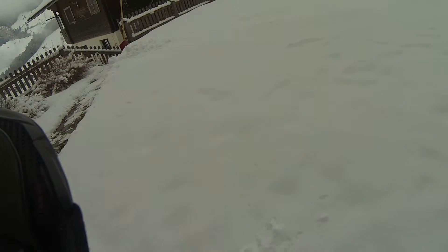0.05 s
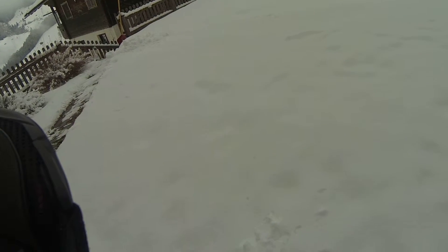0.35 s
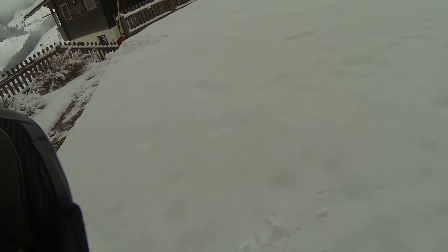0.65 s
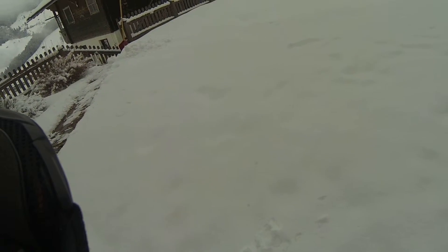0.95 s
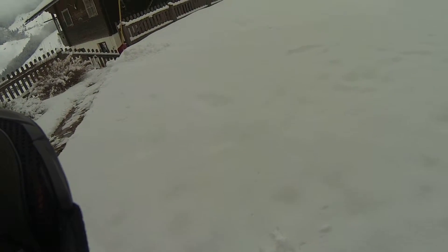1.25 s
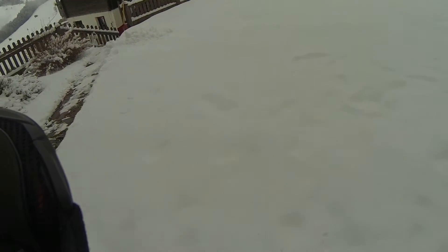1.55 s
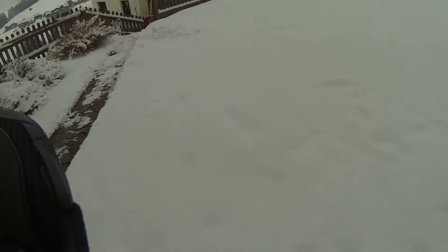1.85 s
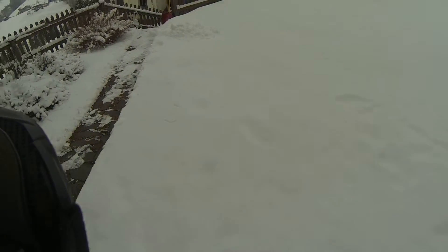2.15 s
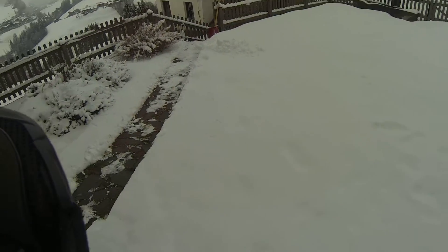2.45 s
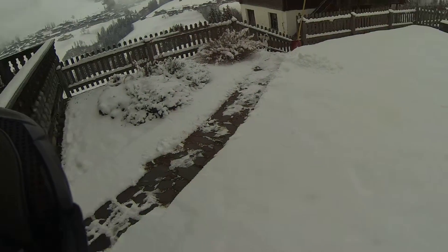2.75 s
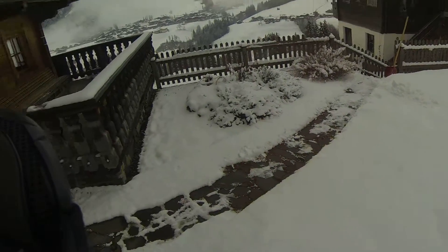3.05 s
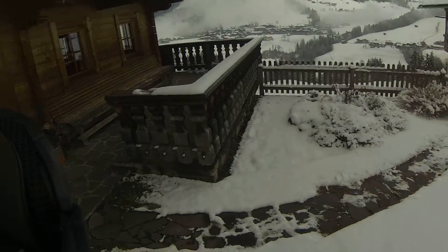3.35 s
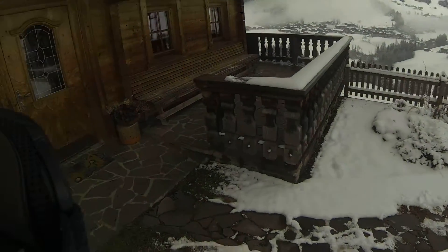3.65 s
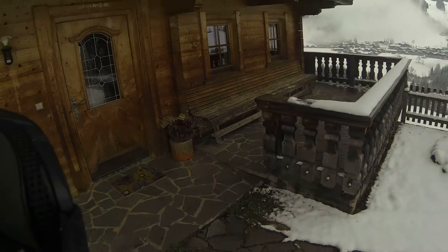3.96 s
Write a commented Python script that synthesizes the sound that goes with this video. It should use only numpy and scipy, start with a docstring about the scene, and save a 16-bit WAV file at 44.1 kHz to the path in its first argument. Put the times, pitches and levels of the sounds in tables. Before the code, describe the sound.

Gear clicks twice against a body-worn camera outdoors, with a low rumble underneath.

```python
"""Two sharp plastic clicks over a low rumble: gear knocks on the housing of a body-worn camera, right
at its one microphone, and nearby walls scatter each click back. Outdoors in the snow, the wearer
stands, then turns round; the rumble is the mount swaying with the body. Clothing brushes faintly
past the housing, and under it all lie quiet air, microphone hiss and two thin electronic whines."""
import sys
import numpy as np
from scipy import signal
from scipy.fft import rfft, irfft
from scipy.io import wavfile
from scipy.ndimage import uniform_filter1d

SR = 44100
rng = np.random.default_rng(int(sys.argv[2]) if len(sys.argv) > 2 else 0)


def store_wav(level_fs):
    """Save 16-bit WAV to argv[1]."""
    pcm = np.round(np.clip(np.atleast_2d(level_fs), -1, 1) * 32767)
    wavfile.write(sys.argv[1], SR, pcm.T.astype(np.int16))


N = 176400
TIME = np.arange(N) / SR
GRIT_LOW_HZ, CLOTH_TREBLE_HZ = 3300, 7070   # lower edge of grit and snags; where cloth's treble begins


def gear_contacts():
    """Gear taps and grates on plastic at the microphone; returns the whole force and the grit alone."""
    # Each click is light touches, a main hit and a rebound.
    # Each row: start in seconds, level in dB, treble cutoff in Hz, grit in dB relative to the tap.
    contacts = [(1.6694, -39.5, 9100, -13), (1.6710, -31, 9900, -14), (1.67282, -13.5, 11600, -33),
                (1.6736, -23, 7300, -27), (1.68, -35.5, 4000, -16), (1.8825, -49, 11000, -12),
                (1.8847, -34.5, 9000, -18.5), (1.88675, -28.5, 10000, -19), (1.8874, -26.5, 7000, -20.5),
                (1.88922, -31.6, 1880, -23), (1.8916, -38.5, 8000, -12)]
    grit_decay_s = 0.0022
    taps, grits = np.zeros((2, N))
    age = TIME[:SR // 50]
    for s, db, bright_hz, grit_db in contacts:
        start = int(s * SR)
        tap = np.maximum(1 - np.abs(age + start / SR - s) * SR, 0)   # an impulse shared by two samples
        grit = from_db(grit_db) * rng.standard_normal(len(age)) * np.exp(-age / grit_decay_s)
        taps[start:start + len(age)] += from_db(db) * lowpass(tap, bright_hz)
        grits[start:start + len(age)] += from_db(db) * lowpass(grit, bright_hz, order=1)
    grits = highpass(grits, GRIT_LOW_HZ)
    return taps + grits, grits


def housing_clicks(force):
    """The housing rings, each struck spot in its own balance of modes; a soft push adds a dull thud."""
    # The housing's modes. Each row: pitch in Hz, gain in dB at the first spot, gain in dB at the
    # second, seconds to die away by 60 dB.
    modes = [(243, -17, -21, 0.0257), (456, -17, -12, 0.023), (1076, -2, 0, .0055), (1430, -3.5, -2, .0131),
             (1582, 1.5, 5, 0.02), (2250, -5.5, -9.5, .0095), (3000, -1, -2.5, 0.01),
             (3634, -4.5, -15, 0.011), (3790, -8, -11, 0.0071), (4729, -8.5, -15.5, 0.009),
             (5290, -10.5, -16.5, 0.0066), (6540, -16, -13.5, 0.0049), (8120, -22, -18.5, 0.0055),
             (11249, -15.5, -19.5, 0.0041), (12982, -16, -20, .004)]
    # The gear's push behind each click. Each row: peak time in seconds, level in dB.
    thuds = [(1.6718, -40.5), (1.886, -30.5)]
    push_s, second_spot_from_s = 0.00054, 1.8
    push = sum(from_db(db) * np.exp(-np.minimum(((TIME - s) / push_s) ** 2, 20)) for s, db in thuds)
    out = signal.oaconvolve(push / (push_s * SR), ring(hz=276, t60=0.022))
    for k, (hz, first_db, second_db, t60) in enumerate(modes):
        strength = np.where(TIME < second_spot_from_s, from_db(first_db), from_db(second_db))
        out += (-1) ** k * signal.oaconvolve(strength * force, ring(hz, t60))
    return highpass(out[:N], hz=140)   # so small a shell radiates little bass


def wall_echoes(force):
    """Walls and a fence a few metres off scatter back a short tail that fades in and dies away."""
    # The colour of the tail. Each row: frequency in Hz, relative level in dB.
    scatter = [(80, -19), (180, -9), (450, -19), (750, -24), (1000, -26), (1300, -8), (1530, 1.5),
               (1750, -5.5), (2050, -18), (2400, -24.5), (2850, -14), (3400, -11.5), (4050, -27.5),
               (5200, -25), (6500, -36), (14000, -52)]
    delay_s, rise_s, t60 = 0.014, 0.0028, 0.21
    age = np.maximum(TIME[:SR // 2] - delay_s, 0)
    tail = noise(scatter)[:len(age)] * (1 - np.exp(-age / rise_s)) * np.exp(-np.log(1000) * age / t60)
    return signal.oaconvolve(force, tail / np.sqrt(np.sum(tail ** 2)))[:N]


def mount_rumble():
    """The mount sways with the body and swings the microphone for a few cycles after each jolt."""
    # The colour of the rumble. Each row: frequency in Hz, relative level in dB.
    rumble_colour = [(12, -0.5), (22, 1.5), (32, -0.5), (41, -6), (52, -26), (70, -28), (100, -42),
                     (200, -48.5), (400, -79)]
    # How hard the mount sways. Each row: time in seconds, relative level in dB.
    sway = [(0, -55.5), (.1, -45), (.15, -38), (.22, -52.5), (.85, -45), (.92, -46), (1.02, -49),
            (1.15, -40), (1.35, -42.5), (1.56, -37), (1.62, -37), (1.72, -31.5), (1.95, -33), (2.15, -34),
            (2.35, -36.5), (2.62, -43), (2.79, -47), (2.86, -37.5), (2.96, -39.5), (3.2, -51), (3.42, -46),
            (3.52, -35), (3.76, -35), (3.87, -44), (4, -36.5)]
    # Each row: start of a jolt in seconds, level in dB, swing in Hz, stiffer mode in relative dB.
    jolts = [(1.691, -24, 34, -17.5), (1.905, -26, 33.6, -12.5), (2.085, -31.5, 29.8, -21),
             (2.69, -35.5, 38, -21), (3.491, -37.5, 61, -22), (3.619, -21.5, 33.3, -28)]
    even_over_s, rise_s, stiff_mode_hz = 0.21, 0.026, 65.2
    rumble = noise(rumble_colour)
    power = uniform_filter1d(np.abs(signal.hilbert(rumble)) ** 2, int(even_over_s * SR)) / 2
    rumble /= np.sqrt(power)   # evened out, so the sway alone shapes its swells
    out = from_db(-1) * level(sway) * rumble
    for s, db, hz, stiff_db in jolts:
        age = np.maximum(TIME - s, 0)
        swell = (age / rise_s * np.exp(1 - age / rise_s)) ** 2
        stiff_mode = from_db(stiff_db) * np.sin(2 * np.pi * stiff_mode_hz * age)
        out -= from_db(db) * swell * (np.cos(2 * np.pi * hz * age) + stiff_mode)
    return out


def clothing():
    """A padded jacket against the microphone: it shuffles, rubs the housing into ringing and swishes."""
    # The jacket's dull shuffle and its rubbing on the housing. Each row: time in seconds, level in dB.
    shuffle = [(0, -72.5), (1.15, -72.5), (1.35, -63.5), (1.55, -67.5), (1.7, -65), (1.95, -59), (2.2, -71),
               (2.6, -74), (3.3, -75.5), (3.6, -66.5), (4, -77.5)]
    rubbing = [(0, -70), (.2, -91), (.37, -72.5), (.7, -81.5), (.84, -68.5), (.95, -69.5), (1.03, -78),
               (1.1, -66.5), (1.2, -66.5), (1.26, -74.5), (1.5, -76), (1.63, -66.5), (1.8, -69),
               (1.86, -62), (1.9, -85), (2.0, -62.5), (2.07, -81), (2.222, -76), (2.236, -51.5),
               (2.252, -66), (2.272, -74), (2.31, -61), (2.43, -82), (2.7, -79), (2.8, -68.5), (2.92, -80),
               (3.4, -81), (3.49, -67), (3.6, -75), (3.8, -78), (3.97, -67.5)]
    # The colours of the shuffle and the swish. Each row: frequency in Hz, relative level in dB.
    shuffle_colour = [(40, -3), (110, -1), (220, 0.5), (450, -3), (800, -17), (2000, -14.5), (6000, -62)]
    swish_colour = [(300, -4), (1000, -5.5), (1350, -6), (1600, 6.5), (1850, -5), (2200, -6.5), (3000, 5.5),
                    (3800, -8), (4800, 0), (5500, -8), (6400, -0.5), (7700, -15), (8700, -13),
                    (9800, -16.5), (11300, -8), (13000, -6), (15000, -22.5)]
    # Single brushes. Each row: peak time, rise and fall in seconds, level in dB, treble in relative dB.
    brushes = [(.38, 0.049, 0.04, -67.5, -5), (.865, 0.06, 0.035, -65.5, -10),
               (1.17, 0.082, 0.0645, -66, -5.5), (2.236, 0.0065, .016, -64.5, -11),
               (2.318, 0.032, 0.027, -62.5, 3), (2.825, 0.065, 0.034, -63.5, -4.5),
               (3.507, 0.054, 0.036, -62.5, -1), (3.96, 0.063, 0.059, -63, -7)]
    out = level(shuffle) * noise(shuffle_colour)
    out += level(rubbing) * resonant_noise(hz=1560.7, width_hz=182) * flicker(db=2.2, rate_hz=40)
    swish = noise(swish_colour) * flicker(db=2.5, rate_hz=150) + from_db(-8) * thread_snags()
    body = lowpass(swish, CLOTH_TREBLE_HZ, order=1)
    treble = swish - body
    for s, rise, fall, db, treble_db in brushes:
        swell = np.exp(-((TIME - s) / np.where(TIME < s, rise, fall)) ** 2)
        treble_swell = from_db(treble_db) * swell ** 1.8   # steeper: a brush is brightest at its peak
        out += from_db(db) * (swell * body + treble_swell * treble)
    return out


def thread_snags():
    """Threads catch and let go in tiny bright ticks of uneven size; unit power."""
    snags_per_s, spread_db = 350, 4
    ticks = (rng.random(N) < snags_per_s / SR) * rng.choice([-1, 1], N)
    sizes = from_db(spread_db * np.minimum(rng.exponential(1, N), 2))
    return rms_one(lowpass(highpass(ticks * sizes, GRIT_LOW_HZ), CLOTH_TREBLE_HZ))


def air_and_electronics():
    """Still air and microphone hiss; the camera's electronics tick and whine faintly at its frame rate."""
    # The colour of the steady air and hiss. Each row: frequency in Hz, relative level in dB.
    air = [(30, 3.5), (75, 2), (120, -2), (200, -6), (300, -9.5), (460, -13), (650, -15.5), (1550, -18.5),
           (2280, -21.5), (2700, -18), (4000, -25), (8300, -32.5), (10000, -34), (12200, -34),
           (14500, -45.5)]
    # Each row: pitch of a whine in Hz, width in Hz, opening and closing level in dB, pulse depth 0 to 1.
    whines = [(5632, 40, -92, -87, .9), (12275, 30, -90.5, -91, .6)]
    frame_hz = 29.97
    out = from_db(-60.5) * noise(air)
    ticking = np.sin(2 * np.pi * frame_hz * TIME) ** 20   # twice a frame
    out += from_db(-75) * resonant_noise(hz=6760, width_hz=5600) * ticking
    for pulses_per_frame, (hz, width_hz, start_db, end_db, depth) in enumerate(whines, start=1):
        pulsing = 1 - depth * np.cos(2 * np.pi * pulses_per_frame * frame_hz * TIME)
        out += from_db(np.linspace(start_db, end_db, N)) * whine(hz, width_hz) * pulsing
    return out


def whine(hz, width_hz):
    """A thin electronic tone of unit power whose pitch wavers."""
    waver = width_hz / 2 * rms_one(lowpass(rng.standard_normal(N), width_hz))
    return np.sqrt(2) * np.sin(2 * np.pi * np.cumsum(hz + waver) / SR)


def ring(hz, t60):
    """One mode's sine after a unit tap, falling 60 dB in t60 seconds."""
    age = TIME[:SR // 10]
    return np.sin(2 * np.pi * hz * age) * np.exp(-np.log(1000) * age / t60)


def noise(spectrum):
    """Noise of unit power, coloured by rows of frequency in Hz and relative level in dB."""
    hz, db = np.transpose(spectrum)
    bins = np.maximum(np.fft.rfftfreq(N, 1 / SR), 1)
    gain = from_db(np.interp(np.log(bins), np.log(hz), db)) * (bins > 10)
    return rms_one(irfft(rfft(rng.standard_normal(N)) * gain, N))


def resonant_noise(hz, width_hz):
    """Noise of unit power in one resonance."""
    sos = signal.butter(2, [hz - width_hz / 2, hz + width_hz / 2], "band", fs=SR, output="sos")
    return rms_one(signal.sosfilt(sos, rng.standard_normal(N)))


def flicker(db, rate_hz):
    """A randomly wavering gain."""
    return from_db(db * rms_one(lowpass(rng.standard_normal(N), rate_hz)))


def level(rows):
    """Gain over time from rows of time in seconds and level in dB."""
    return from_db(np.interp(TIME, *np.transpose(rows)))


def lowpass(x, hz, order=2):
    """Butterworth treble cut."""
    return signal.sosfilt(signal.butter(order, min(hz, SR / 2 - 1000), fs=SR, output="sos"), x)


def highpass(x, hz):
    """Butterworth bass cut."""
    return signal.sosfilt(signal.butter(2, hz, "high", fs=SR, output="sos"), x + 1e-18)


def from_db(db):
    """Decibels to gain."""
    return 10 ** (np.asarray(db) / 20)


def rms_one(x):
    """Scale to unit power."""
    return x / np.sqrt(np.mean(x ** 2) + 1e-20)


def scene():
    """Everything in mono, heard from the camera on the wearer's body."""
    force, grit = gear_contacts()
    knocks = housing_clicks(force) + from_db(-1) * grit   # the grit is also heard directly
    return (knocks + wall_echoes(force) + clothing() + mount_rumble() + air_and_electronics())[None]


def record(dry):
    """The camera cuts the top of the treble steeply."""
    cutoff_hz = 14800
    return signal.sosfilt(signal.ellip(10, .2, 80, cutoff_hz, fs=SR, output="sos"), dry)


dry = scene()
out = record(dry)
store_wav(out)
```